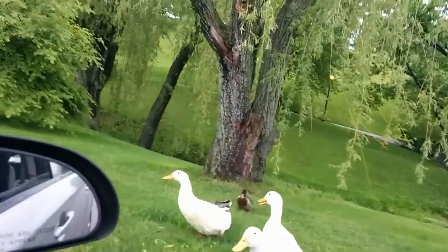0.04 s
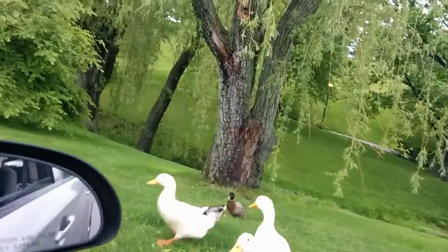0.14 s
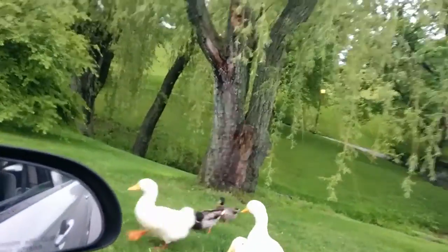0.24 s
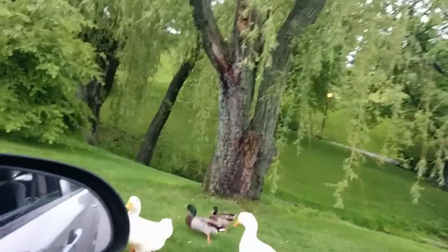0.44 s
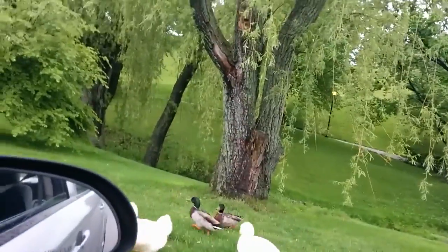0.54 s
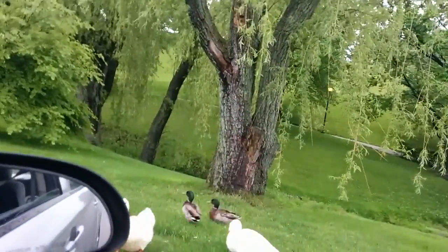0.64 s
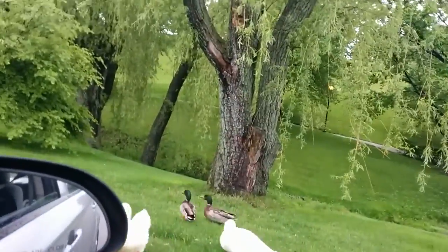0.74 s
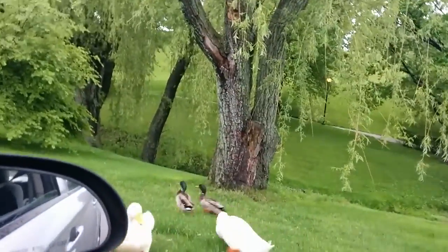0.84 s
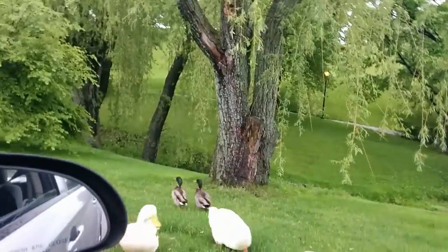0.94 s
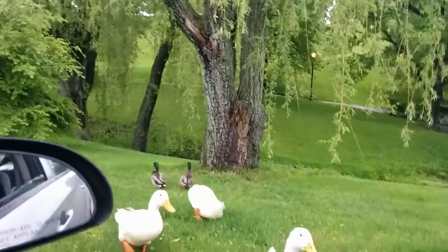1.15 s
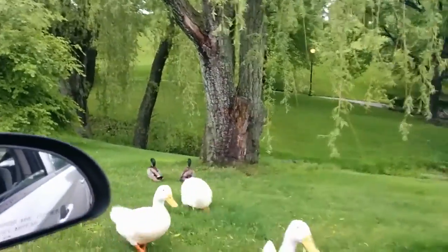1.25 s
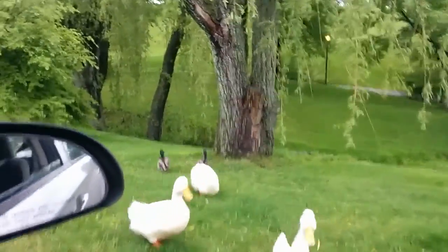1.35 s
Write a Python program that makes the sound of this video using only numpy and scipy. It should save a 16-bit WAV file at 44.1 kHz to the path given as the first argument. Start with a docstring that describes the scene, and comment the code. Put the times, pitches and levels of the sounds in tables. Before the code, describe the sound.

Three quick, loud duck quacks, with softer raspy calls from other ducks outdoors.

```python
"""A duck on a lawn, close to a microphone at the open window of a standing car.
It gives three short loud quacks: a falling squeak, then sharp pulses ringing its throat.
Other ducks answer with hoarse, fluttering rasps of air, thin wheezes, soft peeps and bill clicks.
The car body scatters their calls. Around the microphone the cabin booms softly, more towards
the end; outside lie a quiet hush and two faint rustles."""
import sys
import numpy as np
from scipy import signal
from scipy.fft import rfft, irfft
from scipy.io import wavfile

SR = 44100
rng = np.random.default_rng(int(sys.argv[2]) if len(sys.argv) > 2 else 0)


def transcribe(u):
    """Save the signal u as a 16-bit wav file named by the first command-line argument.

    u: samples, shape (n,) or (channels, n), limited to [-1, 1]; the rate is SR.
    q: integer samples, one column per channel.
    """
    v = np.clip(np.atleast_2d(u).T, -1, 1)
    q = np.round(v * 32767).astype(np.int16)
    wavfile.write(sys.argv[1], SR, q)


N = 61739
T = np.arange(N) / SR

# Quiet air over the lawn: frequency_hz, level_db
HUSH_SPECTRUM = [(30, -12), (85, 1.5), (200, -8), (450, -9), (780, -12), (1200, -17.5), (1800, -21.5),
                 (4500, -35), (8000, -29.5), (16000, -35.5)]
# Resonances of the cabin around the microphone: centre_hz, width_hz, level_db
CABIN_RESONANCES = [(82, 30, -6.5), (174, 110, 5), (295, 190, 7)]
# Rise and fall of the cabin's boom: time_s, level_db
BOOM_LEVELS = [(0, -45.5), (0.035, -52), (0.065, -89), (0.135, -56.5), (0.2, -77), (0.26, -53), (0.36, -72),
               (0.645, -53), (0.685, -96), (0.925, -66), (0.955, -54.5), (1.06, -48.5), (1.098, -69),
               (1.14, -49.5), (1.29, -45.5), (1.35, -38), (1.4, -61)]
# Rasps from the other ducks: start_s, length_s, level_db, swell_db_per_s, main_hz, low_hz, low_db,
# upper_hz, upper_db, hiss_db, flutter_depth (full at 1 and above)
RASP_CALLS = [(-0.01, 0.099, -54.5, -130, 1804, 1100, 9.5, 2880, 4, -2.5, 0.08),
              (0.128, 0.094, -46.5, 7, 1856, 1242, 3, 2410, -5.5, -5, 0),
              (0.366, 0.049, -40.5, 199, 1930, 1080, -13.5, 2740, -12.5, -15.5, 0),
              (0.528, 0.016, -43.5, 6, 1400, 900, 9.5, 2560, -3, -5.5, 0),
              (0.602, 0.047, -42, -111, 1790, 1170, -30, 2600, -12.5, -9, 1.23),
              (0.654, 0.037, -46, -61, 1764, 1090, -28, 2520, -2.5, -10, 0),
              (0.839, 0.0648, -38, -5, 1783, 815, -27, 2714, -13.5, -24.5, 0.7),
              (1.068, 0.043, -49, -40, 1776, 812, -1.5, 2100, -4.5, -33.5, 0.2),
              (1.117, 0.059, -44.5, -68, 1811, 840, -7.5, 2700, -13.5, -27.5, 0.57),
              (1.31, 0.064, -52.5, 41, 1810, 860, 10, 2090, 6, -5.5, 0)]
# Breath hiss in a rasp: frequency_hz, level_db
RASP_HISS_SPECTRUM = [(50, -27.5), (500, 13), (1400, -9), (3900, -2.5), (4700, -28), (6000, -9.5),
                      (7400, -10.5), (10000, -17), (16000, -37.5)]
# Snaps of a bill: start_s, level_db, centre_hz, decay_s, spray_db
BILL_CLICKS = [(0.124, -39.5, 3235, 0.012, -33), (0.503, -39.5, 3340, 0.0094, -16.5),
               (0.892, -22.5, 5030, 0.0022, 0), (0.902, -37, 3160, 0.0068, -23.5),
               (1.303, -39, 3430, 0.0089, -37)]
# Bright edge of an open bill, also the spray of a click: frequency_hz, level_db
BILL_SPECTRUM = [(700, -61), (2800, -23), (3600, 1.5), (4200, -3.5), (4900, 5), (5350, -4), (5800, 1),
                 (6600, -9), (8000, -16.5), (11000, -28), (16000, -42)]
# Thin wheezes in the rasps: middle_s, half_length_s, level_db, centre_hz
RASP_WHEEZES = [(0.2, 0.046, -59.5, 3970), (0.402, 0.019, -54.5, 4330), (0.667, 0.02, -49, 6110)]
# The squeak that opens each quack: middle_s, width_s, level_db, pitch_hz, fall_octaves_per_s
OPENING_SQUEAKS = [(0.227, 0.007, -32, 643, 30.4), (0.416, 0.01, -28.5, 742, 22.8),
                   (0.555, 0.0038, -32, 870, 45)]
# Quacks close to the microphone: peak_s, level_db, pitch_hz, rise_db_per_s, fall_db_per_s, edge_db,
# voiced_before_s, voiced_after_s, accent_db (on the pulse at the peak)
CLOSE_QUACKS = [(0.252, -22.5, 143.6, 148, 395.5, -24, 0.014, 0.024, -0.5),
                (0.434, -16, 180.8, 678.5, 429, -14.5, 0.014, 0.044, 4),
                (0.579, -20.5, 171.2, 480, 608, -13, 0.02, 0.029, 4)]
# Throat of the close duck: centre_hz, width_hz, gain_db
THROAT_RESONANCES = [(610, 90, 4), (1100, 75, 5.5), (1470, 110, 3.5), (2480, 190, 5)]
# Faint high rustles: middle_s, width_s, level_db
FAINT_RUSTLES = [(0.6, 0.004, -56), (1.295, 0.012, -65)]
# Soft peeps and coos: middle_s, width_s, level_db, pitch_hz
SOFT_PEEPS = [(0.88, 0.026, -52, 762), (1.192, 0.034, -51.5, 850), (1.343, 0.02, -41.5, 577),
              (1.335, 0.019, -44, 990)]
# Dull bumps in the cabin: middle_s, width_s, level_db, pitch_hz
CABIN_BUMPS = [(0.96, 0.0083, -41, 172.3), (1.208, 0.011, -46, 101), (1.377, 0.011, -33, 175)]


def from_db(db):
    """Decibels to gain."""
    return 10 ** (np.asarray(db) / 20)


def rms_one(x):
    """Scale to rms 1."""
    return x / np.sqrt(np.mean(x ** 2) + 1e-20)


def bell_curve(middle_s, width_s):
    """A Gaussian swell and fade, 1 at its middle."""
    return np.exp(-.5 * ((T - middle_s) / width_s) ** 2)


def band(x, low_hz, high_hz):
    """Pass the band between two edges."""
    return signal.sosfilt(signal.butter(2, [low_hz, high_hz], "band", fs=SR, output="sos"), x + 1e-18)


def band_around(x, hz, width_hz):
    """Pass a band around hz; rms 1."""
    return rms_one(band(x, hz - width_hz / 2, hz + width_hz / 2))


def resonate(x, hz, width_hz):
    """One resonance, gain 1 at its peak."""
    radius = np.exp(-np.pi * width_hz / SR)
    feedback = [1, -2 * radius * np.cos(2 * np.pi * hz / SR), radius ** 2]
    return signal.lfilter(np.array([1, 0, -1]) * (1 - radius ** 2) / 2, feedback, x + 1e-18)


def air_band(hz, width_hz, gate=1):
    """Gated air noise through a steep resonance; rms 1."""
    return band_around(gate * rng.standard_normal(N), hz, width_hz)


def coloured_noise(spectrum, gate=1):
    """Noise, gated and then shaped to a spectrum; rms 1."""
    hz, db = np.transpose(spectrum)
    bins_hz = np.maximum(np.arange(N // 2 + 1) * SR / N, 1)
    gain = from_db(np.interp(np.log(bins_hz), np.log(hz), db))
    return rms_one(irfft(rfft(gate * rng.standard_normal(N)) * gain, N))


def wander(rate_hz):
    """Random drift with a spread of about 1."""
    return np.interp(T * rate_hz, np.arange(1024), rng.standard_normal(1024))


def cycles(hz, from_s, jitter, jitter_hz):
    """Cycles of an unsteady pitch, counted from from_s; jitter is a fraction of the pitch."""
    turns = np.cumsum(hz * (1 + jitter * wander(jitter_hz))) / SR
    return turns - np.interp(from_s, T, turns)


def outdoor_hush(level_db=-62.5):
    """Steady, quiet air heard through the open window."""
    return from_db(level_db) * coloured_noise(HUSH_SPECTRUM)


def cabin_boom(hum_hz=173.2, hum_db=-3, noise_db=-3.5):
    """Low noise in the cabin's resonances and a wavering hum, swelling and dipping together."""
    boom = rms_one(sum(from_db(db) * air_band(hz, width) for hz, width, db in CABIN_RESONANCES))
    hum = np.sqrt(2) * np.sin(2 * np.pi * cycles(hum_hz, 0, jitter=.03, jitter_hz=24))
    envelope = from_db(np.interp(T, *np.transpose(BOOM_LEVELS)))
    return envelope * (from_db(noise_db) * boom + from_db(hum_db) * hum)


def flutter(from_s, depth, rate_hz=95.6):
    """The uneven beat that chops a drake's air stream; rms 1."""
    turns = cycles(rate_hz, from_s, jitter=.18, jitter_hz=60)
    return rms_one(1 + depth * np.cos(2 * np.pi * turns))


def rasp(start_s, length_s, level_db, swell_db_per_s, main_hz, low_hz, low_db,
         upper_hz, upper_db, hiss_db, flutter_depth):
    """Chopped air blown through a drake's throat; the deeper the flutter, the purer the main note."""
    attack_s, release_s = .016, .014
    t = T - start_s
    depth = np.clip(flutter_depth, 0, 1)
    gate = flutter(start_s, depth)
    tone = np.sqrt(2) * np.sin(2 * np.pi * cycles(main_hz, start_s, jitter=.022, jitter_hz=300))
    main = depth * tone + np.sqrt(1 - depth ** 2) * air_band(main_hz, width_hz=200)
    neighbour = from_db(-8) * air_band(main_hz * 1.167, width_hz=200)
    low = from_db(low_db) * air_band(low_hz, width_hz=313, gate=gate)
    upper = from_db(upper_db) * air_band(upper_hz, width_hz=346, gate=gate)
    hiss = from_db(hiss_db) * coloured_noise(RASP_HISS_SPECTRUM)
    voice = gate * (main + neighbour) + low + upper + hiss
    attack = (1 + np.tanh(2 * t / attack_s)) / 2
    release = (1 - np.tanh(2 * (t - length_s) / release_s)) / 2
    swell_db = swell_db_per_s * (np.clip(t, 0, length_s) - length_s / 2)
    return from_db(level_db + swell_db) * attack * release * voice


def car_reflections(calls, level_db=-11, delay_s=.0011, decay_s=.016):
    """A brief scatter off the door and window frame beside the microphone."""
    response = rng.standard_normal(N) * np.exp(-T / decay_s) * (T > delay_s)
    return from_db(level_db) * signal.fftconvolve(calls, response / np.linalg.norm(response))[:N]


def bill_click(start_s, level_db, centre_hz, decay_s, spray_db, attack_s=.002):
    """A bill snaps: a bright band of noise with a broad spray."""
    t = np.maximum(T - start_s, 0)
    envelope = (1 - np.exp(-t / attack_s)) ** 2 * np.exp(-t / decay_s)
    snap = air_band(centre_hz, width_hz=700)
    spray = from_db(spray_db) * coloured_noise(BILL_SPECTRUM)
    return from_db(level_db) * envelope * (snap + spray)


def wheeze(middle_s, half_length_s, level_db, centre_hz):
    """A high, narrow band of fluttering air within a rasp."""
    envelope = np.exp(-((T - middle_s) / half_length_s) ** 4)
    gate = flutter(middle_s - .003, depth=1)
    return from_db(level_db) * envelope * air_band(centre_hz, width_hz=900, gate=gate)


def squeak(middle_s, width_s, level_db, pitch_hz, fall_octaves_per_s, octave_db=-8):
    """The close duck's voice opens on a falling tone with its octave, just ahead of a quack."""
    falling_hz = pitch_hz * 2 ** (-fall_octaves_per_s * np.clip(T - middle_s, -.012, .02))
    phase = 2 * np.pi * cycles(falling_hz, middle_s, jitter=.065, jitter_hz=300)
    tone = np.sin(phase) + from_db(octave_db) * np.sin(2 * phase)
    return from_db(level_db) * bell_curve(middle_s, width_s) * tone


def quack(peak_s, level_db, pitch_hz, rise_db_per_s, fall_db_per_s, edge_db,
          voiced_before_s, voiced_after_s, accent_db):
    """Close up: sharp pulses, sagging in pitch, ring the throat; the open bill adds a bright edge."""
    sag_octaves_per_s, shimmer_db, breath = 6.5, 3, .42
    body_db, fundamental_db, chest_db = -22, -28, -20.5
    bill_lag_s, bill_width_s, bill_rest = .0047, .017, .07
    fade_in_s, accent_s, fade_out_s = .0038, .0025, .0028
    t = T - peak_s

    sagging_hz = pitch_hz * 2 ** (-sag_octaves_per_s * np.clip(t, 0, .04))
    turns = cycles(sagging_hz, peak_s - .0007, jitter=.065, jitter_hz=170)
    pulses = np.diff(np.floor(turns), prepend=np.floor(turns[0]))  # one per cycle
    pulses *= from_db(shimmer_db * wander(200))
    air = rms_one(pulses) + breath * rng.standard_normal(N)

    body = from_db(body_db) * band_around(air, hz=290, width_hz=290)
    fundamental = from_db(fundamental_db) * np.cos(2 * np.pi * turns)
    steep_top = signal.butter(4, 2020, fs=SR, output="sos")
    throat = signal.sosfilt(steep_top, band(air, low_hz=830, high_hz=1710))
    ringing = sum(from_db(db) * resonate(throat, hz, width) for hz, width, db in THROAT_RESONANCES)
    accent = from_db(accent_db * np.exp(-(t / accent_s) ** 2))
    voice = accent * rms_one(throat + ringing) + body + fundamental

    bill_opening = bill_rest + (1 - bill_rest) * np.exp(-((t - bill_lag_s) / bill_width_s) ** 2)
    puffs = rms_one(1 + .8 * np.sin(2 * np.pi * turns))
    edge = from_db(edge_db) * bill_opening * coloured_noise(BILL_SPECTRUM, puffs)

    # A low chest resonance lingers as the quack dies.
    chest_swell = (1 + np.tanh(t / bill_width_s)) / 2
    chest = from_db(chest_db) * chest_swell * band_around(throat, hz=565, width_hz=240)

    fade_in = np.exp(np.minimum(t + voiced_before_s, 0) / fade_in_s)
    fade_out = np.exp(-np.maximum(t - voiced_after_s, 0) / fade_out_s)
    effort = from_db(np.minimum(rise_db_per_s * t, -fall_db_per_s * t))
    return from_db(level_db) * fade_in * fade_out * (effort * (voice + edge) + chest)


def rustle(middle_s, width_s, level_db, centre_hz=9850):
    """A faint, high swish."""
    return from_db(level_db) * bell_curve(middle_s, width_s) * air_band(centre_hz, centre_hz / 2)


def peep(middle_s, width_s, level_db, pitch_hz):
    """A duck's soft, nearly pure note from the lawn, wavering slightly."""
    tone = np.sin(2 * np.pi * cycles(pitch_hz, middle_s, jitter=.018, jitter_hz=300))
    return from_db(level_db) * bell_curve(middle_s, width_s) * tone


def cabin_bump(middle_s, width_s, level_db, pitch_hz):
    """A dull bump inside the car: a few cycles of a low tone."""
    tone = np.sin(2 * np.pi * pitch_hz * (T - middle_s))
    return from_db(level_db) * bell_curve(middle_s, width_s) * tone


def scene():
    """All that reaches the one microphone: ducks, their reflections, rustles, cabin and hush."""
    ducks = sum(quack(*row) for row in CLOSE_QUACKS)
    ducks += sum(squeak(*row) for row in OPENING_SQUEAKS)
    ducks += sum(rasp(*row) for row in RASP_CALLS)
    ducks += sum(wheeze(*row) for row in RASP_WHEEZES)
    ducks += sum(bill_click(*row) for row in BILL_CLICKS)
    ducks += sum(peep(*row) for row in SOFT_PEEPS)
    reflections = car_reflections(ducks)
    rustles = sum(rustle(*row) for row in FAINT_RUSTLES)
    cabin = cabin_boom() + sum(cabin_bump(*row) for row in CABIN_BUMPS)
    return (ducks + reflections + rustles + cabin + outdoor_hush())[None]


def record(dry):
    """The microphone's signal, with the highest treble cut steeply."""
    cutoff_hz = 15900
    return signal.sosfilt(signal.ellip(10, .1, 80, cutoff_hz, fs=SR, output="sos"), dry)


dry = scene()
out = record(dry)
transcribe(out)
```